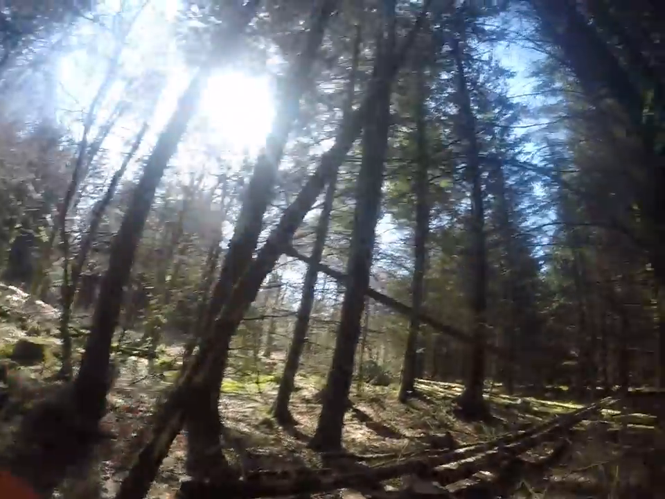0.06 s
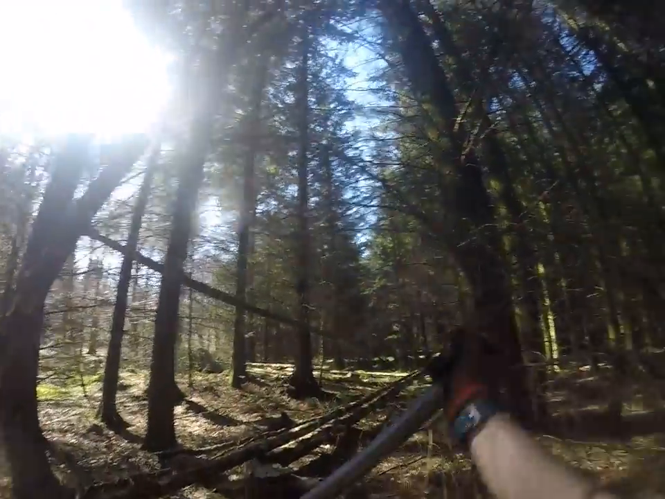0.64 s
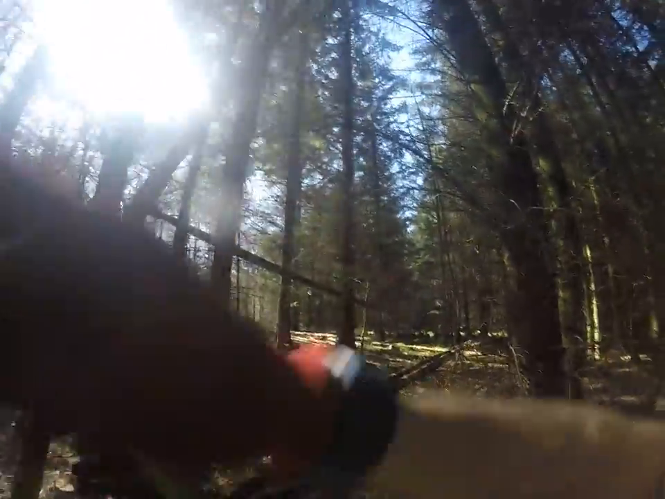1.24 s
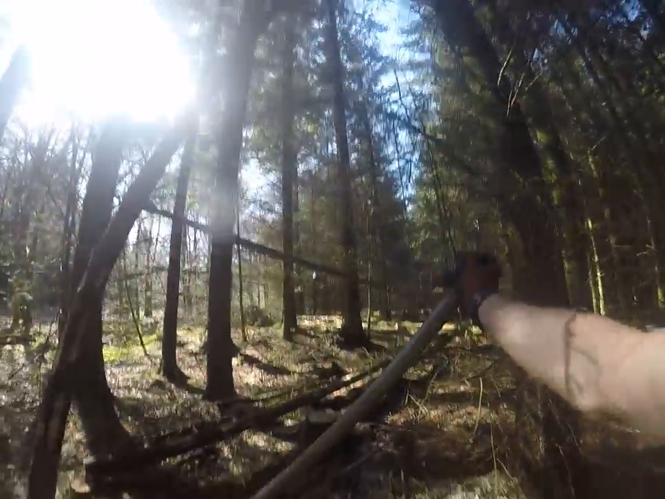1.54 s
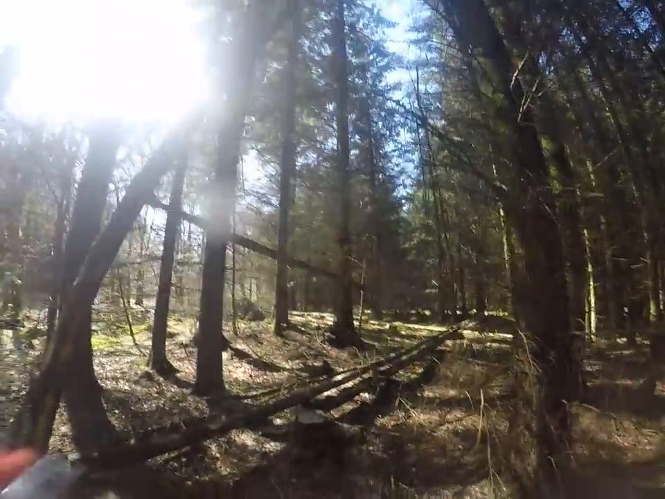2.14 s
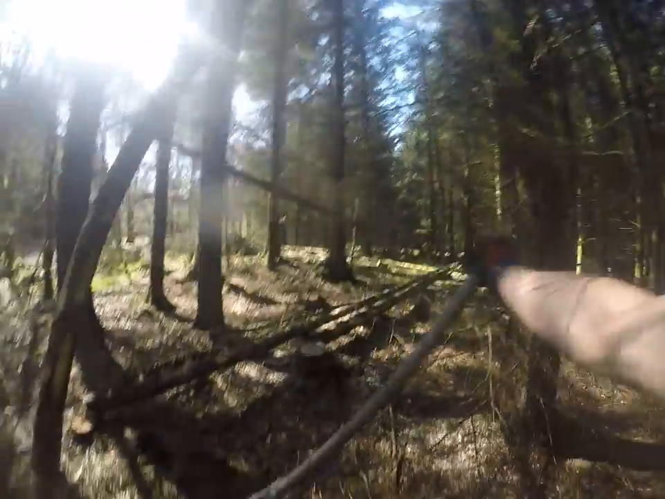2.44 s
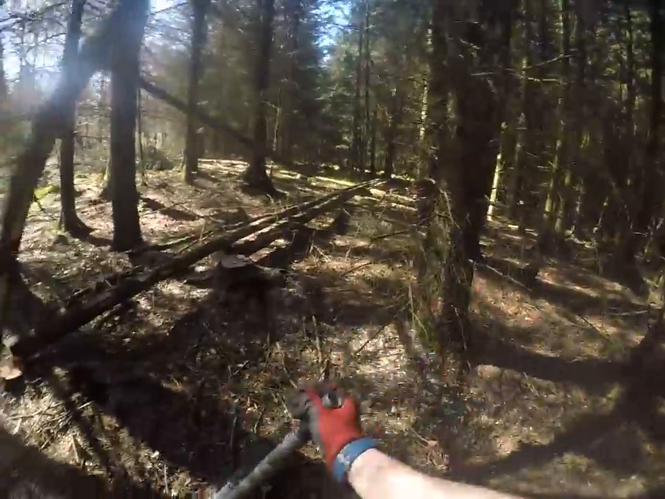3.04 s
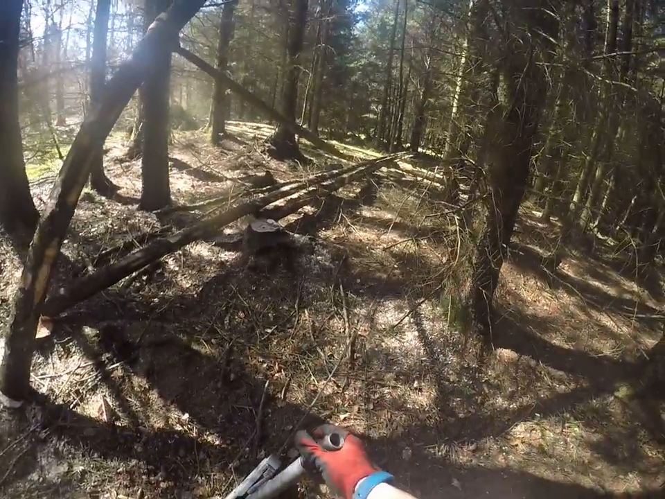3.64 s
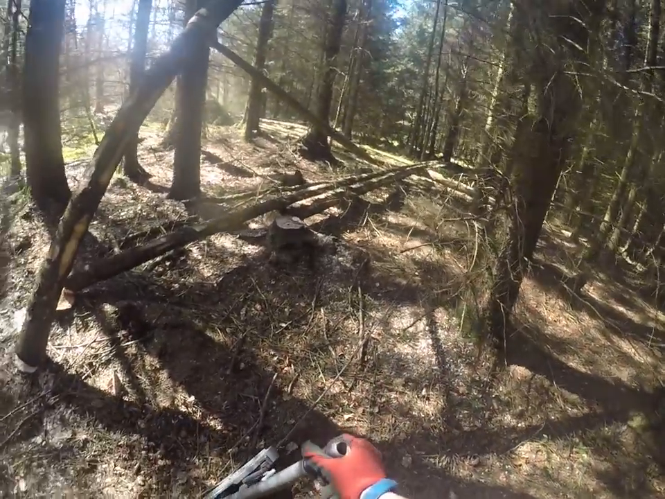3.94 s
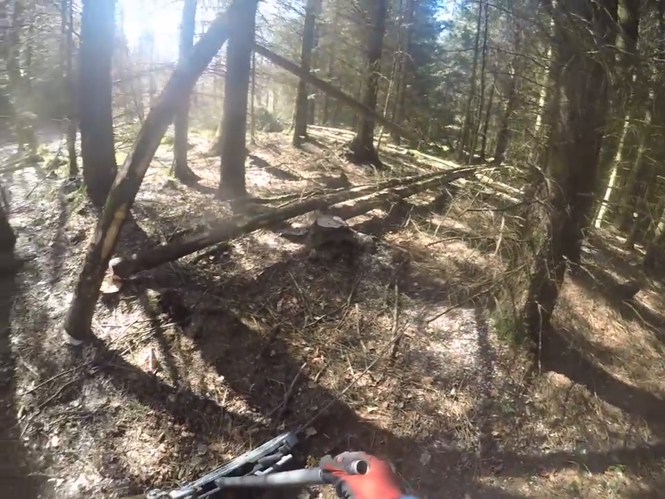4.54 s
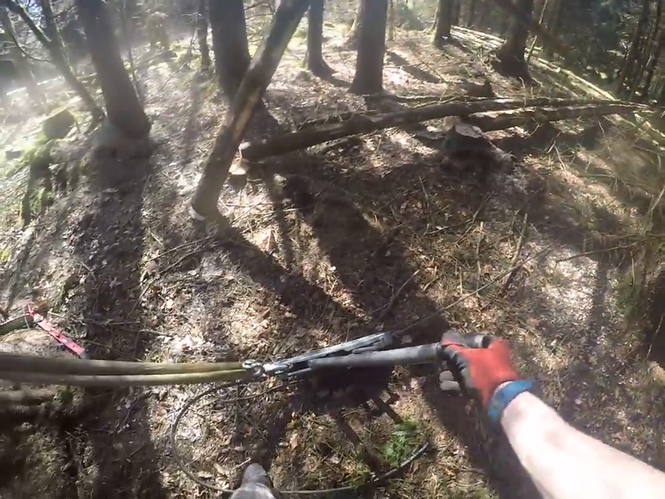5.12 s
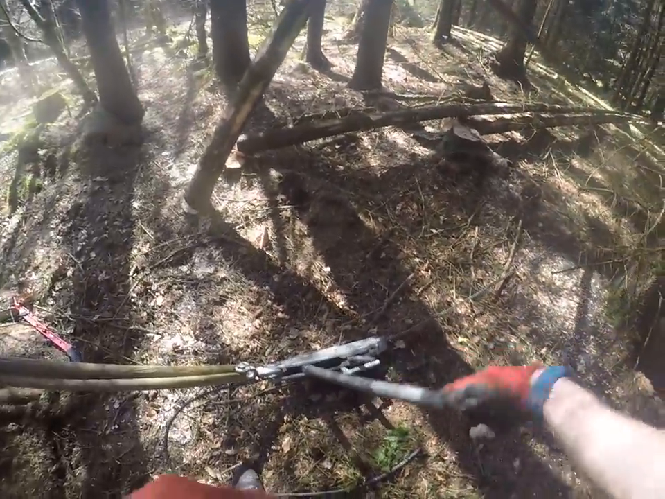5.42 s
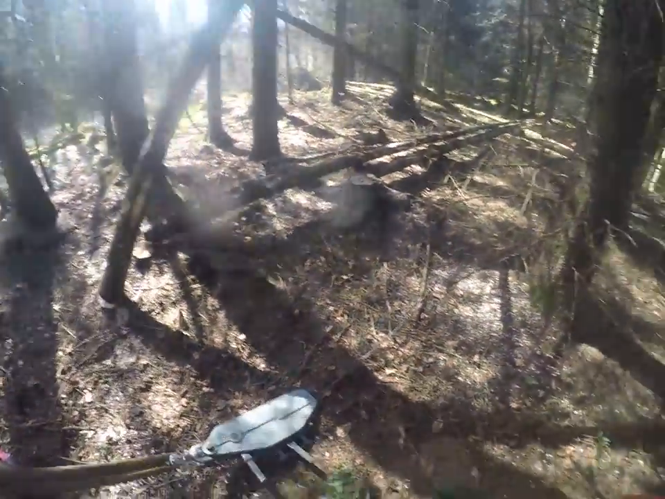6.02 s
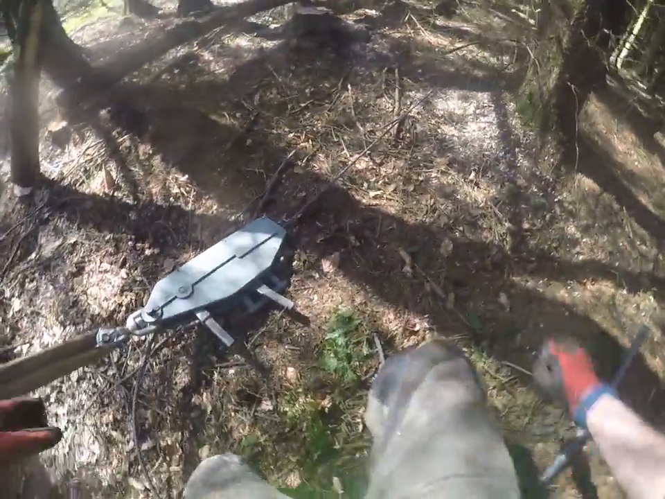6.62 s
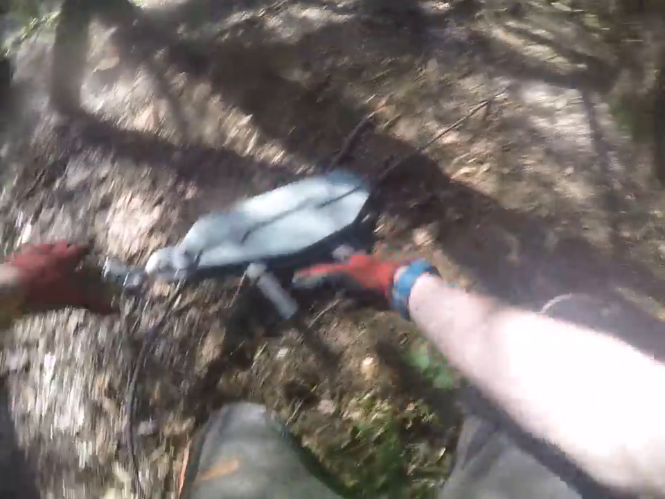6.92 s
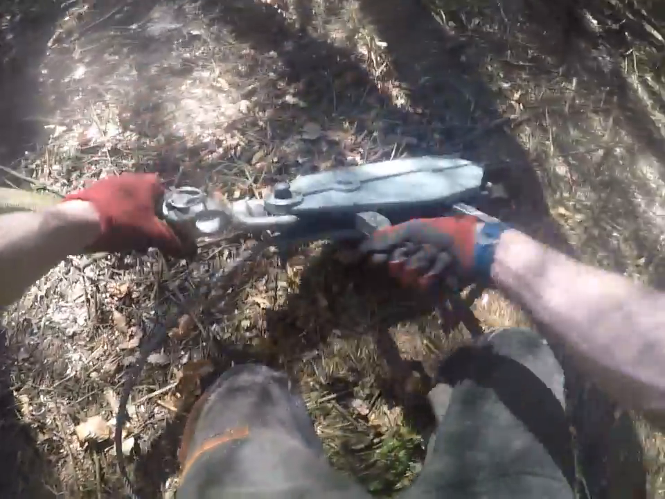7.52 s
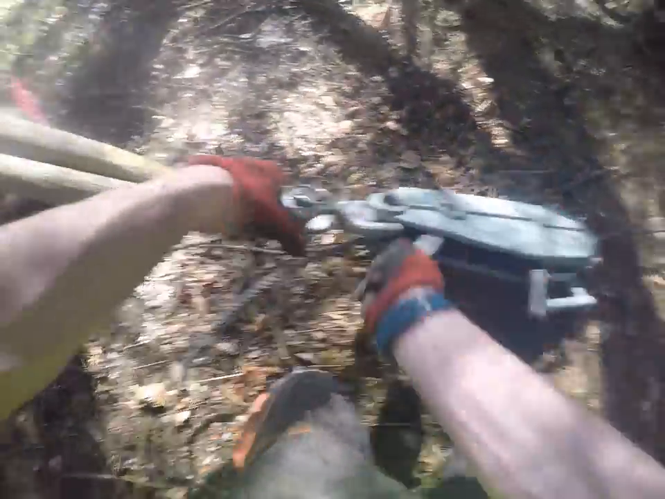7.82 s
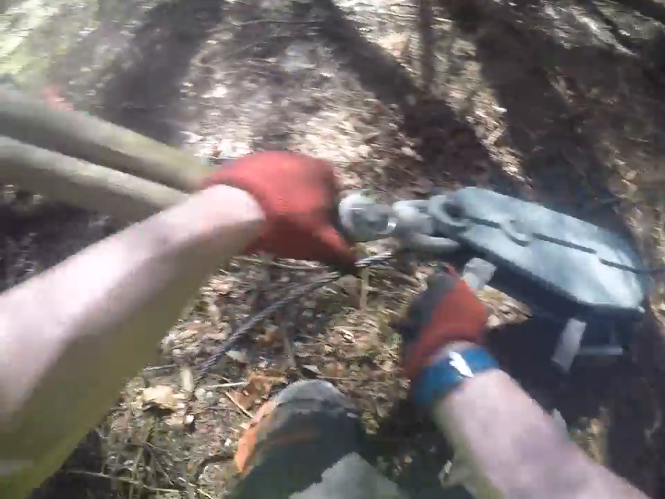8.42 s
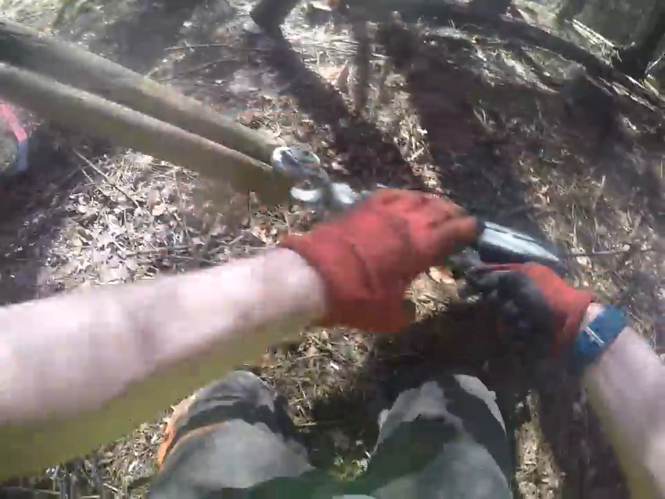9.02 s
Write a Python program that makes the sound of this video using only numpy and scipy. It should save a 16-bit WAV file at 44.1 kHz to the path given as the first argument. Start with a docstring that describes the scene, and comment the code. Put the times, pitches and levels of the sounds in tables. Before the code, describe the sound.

A hand cable winch is levered with close clothing rubs, knocks and rumble, then its steel parts clack loudly as it is picked up.

```python
"""In a forest, a hand cable winch is worked, heard from a camera worn on the body.
As the lever is pumped, clothing rubs the camera in short strokes of stick-slip friction, and its
case knocks and rumbles with every move. Feet crunch on dry litter. Then the winch is picked up: its
steel jaws and levers clack and ring close by, hard enough to overload the microphone."""
import sys
import numpy as np
from scipy import signal
from scipy.fft import rfft, irfft, next_fast_len
from scipy.io import wavfile
from scipy.ndimage import uniform_filter1d, map_coordinates

SR = 44100
rng = np.random.default_rng(int(sys.argv[2]) if len(sys.argv) > 2 else 0)


def int16_out(signal):
    """Quantize to a 16-bit WAV file."""
    q = np.round(np.clip(np.atleast_2d(signal).T, -1, 1) * 32767)
    wavfile.write(sys.argv[1], SR, q.astype(np.int16))


N = 408366

# Steel-on-steel hits; hollowness lifts 700-950 Hz, brightness lifts the top from 5 kHz:
# (time [s], level [dB], hollowness [dB], brightness [dB], thump [dB])
CLACK_HITS = [(6.9762, 2.5, -2.5, -7.5, -23.5), (6.9786, -11.5, 17, 8, -22), (6.9826, -4, 2, -9.5, -7),
              (7.0811, -20.5, 8.5, -19, -25), (7.369, -0.5, 5.5, 2.5, -24.5),
              (7.3741, -14, -3.5, -6, -21.5), (7.395, -27.5, 2, -4, -37.5), (7.405, -28, 7, -11, -29.5),
              (7.4328, -6, 4.5, -3, -14.5), (7.5462, -10, -1, 8, -29), (7.7031, -17.5, 7.5, 0.5, -74),
              (7.7131, -17.5, -9.5, -6, -59), (7.9298, -6.5, 7.5, 8, -41.5), (7.9369, -9, -4.5, 5, -39.5),
              (7.9818, -19.5, 6, -4, -24.5), (8.2001, -8.5, -7, 6, -43.5), (8.2078, -3.5, -1.5, -4, -31.5),
              (8.2217, -17.5, -3.5, 1, -29.5), (8.237, -17, 7.5, -13.5, -53), (8.2435, -4, -6, 7, -11),
              (8.755, -5.5, -11, 3, -24), (8.7611, -3, 0, 1, -25), (8.7901, -18, 5, -5, -38.5),
              (8.8033, -18, 1.5, -8.5, -34)]
# The ring of the winch: (frequency [Hz], level [dB], t60 [s])
WINCH_MODES = [(734, -14.5, 0.051), (844, -11.5, 0.04), (1108, -8.5, 0.035), (1257, -2.5, 0.019),
               (1453, 2.5, 0.018), (1635, 1.5, 0.011), (1830, -21.5, 0.076), (2050, -3, .018),
               (2246, 1.5, 0.015), (2512, -1.5, 0.02), (2800, -9.5, .022), (2810, -21, 0.064),
               (3342, -5.5, 0.016), (3560, -16, 0.0092), (3900, -10.5, .016), (4640, -15.5, 0.024),
               (5640, -14.5, 0.016), (5820, -7.5, 0.0067), (6400, -19.5, 0.015), (6700, -17, 0.0096)]
# The bite of a steel contact: (frequency [Hz], level [dB])
STEEL_SPECTRUM = [(100, -48), (500, -5.5), (1200, 1), (2500, 6), (3000, -5.5), (3600, 9), (6300, -13),
                  (8500, -12), (10000, -38), (15000, -37.5)]
def winch_clacks():
    """Jaws and levers strike steel: a hard crack and a short metallic ring."""
    return impacts(CLACK_HITS, WINCH_MODES, STEEL_SPECTRUM, crack_db=-5.5, crack_t60=0.011,
                   tail_db=-34.5, tail_t60=0.06, body_db=-4.5, gain_db=-0.5)


# Metal sliding on metal: (time [s], level [dB], length [s], brightness [dB])
SLIP_CUES = [(5.396, -39, .006, -1), (5.425, -36.5, 0.01, 0), (5.456, -24.5, 0.0069, -8),
             (5.95, -30, 0.019, -8), (5.989, -23.5, 0.018, -19), (6.037, -40, 0.0077, 15),
             (6.676, -28, 0.011, 18), (6.872, -27, .006, -23), (8.099, -44.5, 0.029, 2.5),
             (8.154, -42, 0.033, 6), (8.356, -46, .014, -8), (8.499, -44, 0.0066, -11),
             (8.598, -45.5, 0.015, 5.5), (8.643, -45, 0.015, 6), (8.685, -45.5, 0.023, 6.5),
             (8.724, -39.5, 0.011, -3)]
# The ring of the fittings: (frequency [Hz], level [dB], t60 [s])
FITTING_MODES = [(1808, 3.5, 0.035), (1970, -4, 0.026), (2540, -4, 0.062), (3400, 0, 0.007),
                 (4060, -13.5, 0.012), (4430, -4.5, 0.038), (5480, -10, 0.0092), (8000, -4.5, 0.0024)]
def cable_slips():
    """Cable and fittings slide in short gritty rasps; each spot rings at a slightly different pitch."""
    track, t = np.zeros(N), np.arange(SR // 10) / SR
    for start, db, length, bright_db in SLIP_CUES:
        detune = np.exp(0.025 * rng.standard_normal())
        spot = ring(FITTING_MODES, t * detune, scatter_db=2)
        ringing = unit(signal.fftconvolve(rng.standard_normal(len(t)), spot)[:len(t)])
        grit = unit(colour(rng.standard_normal(len(t)) ** 3, STEEL_SPECTRUM))
        rasp = colour(ringing + amp(-10.5) * grit, [(2500, 0), (7000, bright_db)])
        rise = 3 * t / length  # the swell peaks a third of the way in
        add(track, start, amp(db) * unit(rasp) * rise * np.exp(1 - rise))
    return track


# Knocks through the case: (time [s], level [dB], hollowness [dB], brightness [dB], thump [dB])
KNOCK_HITS = [(0.1537, -8.5, -16, 2.5, -28), (0.182, -26.5, 1, -4, -32), (0.2944, -18, 4.5, -4, -22),
              (0.449, -12, -10, -13.5, -33.5), (0.8418, -9.5, -8, -2.5, -36), (0.8963, -23, 6, 3, -18),
              (1.0109, -15.5, 18, -15, -21.5), (1.0646, -27, 0, -5.5, -17), (1.0728, -6, -3, 5.5, -30),
              (1.0748, -10, 8, -5, -14), (1.1245, -14.5, 11.5, -10, -15.5), (1.1823, -23, 17.5, 1, -35),
              (1.3742, -15, 5, 0.5, -18), (1.4495, -31, 12, 5, -20), (1.5197, -24, 4, -21, -38),
              (1.5962, -24, -25, -43, -32), (1.6697, -25, 1, -16, -33), (1.702, -27, 3, -15, -33),
              (1.7618, -19.5, 3, -8, -17), (1.805, -25.5, -4, 2, -37), (1.9766, -27, 5.5, -1, -30),
              (2.1158, -23.5, -2.5, -1, -20.5), (2.3198, -29, -4, -5, -30),
              (2.855, -24.5, -11.5, -15, -18.5), (2.8674, -24.5, -19, 1, -36),
              (2.9206, -22.5, -17, -7, -23), (2.979, -24, -18, -6, -49), (2.9844, -19, -6, -12, -15),
              (2.996, -4.5, -2.5, 2, -9), (3.164, -28.5, -9, 0, -24.5), (3.2267, -29.5, -17, -1, -21),
              (3.425, -29, -10, 0, -25.5), (3.541, -30.5, -2.5, -4, -31), (4.529, -38.5, 11.5, 2, -32),
              (4.8398, -11.5, 15, -14, -13), (4.908, -13, 13.5, -5, -8.5), (5.6964, -24.5, 16, 13, -32.5),
              (6.0217, -25.5, -6, -1, -14.5), (6.112, -15, -11.5, -14, -40), (6.7879, -21, -5, -15.5, -7)]
# The ring of the camera case: (frequency [Hz], level [dB], t60 [s])
CASE_MODES = [(781, -8.5, 0.032), (968, -12, 0.045), (1524, -5, 0.013), (1740, -6, 0.014), (2007, 2, 0.013),
              (2356, -4, 0.02), (3430, -13, 0.017), (4120, -12.5, 0.0087), (5370, -25, 0.0069),
              (6450, -28, 0.0038)]
# The attack of a knock: (frequency [Hz], level [dB])
KNOCK_SPECTRUM = [(100, 13.5), (500, -12.5), (1600, 8), (2400, 1.5), (3000, -12.5), (6000, -14),
                  (8000, -36), (14000, -44.5)]
def case_knocks():
    """The camera case knocks as the lever is worked and ticks faintly under the clothing."""
    hits = KNOCK_HITS + cloth_ticks(per_second=10, max_per_stroke=6)
    return impacts(hits, CASE_MODES, KNOCK_SPECTRUM, crack_db=0, crack_t60=0.014,
                   tail_db=-24.5, tail_t60=0.071, body_db=0, gain_db=-1)


# How hard the body shakes the camera: (time [s], sway [dB], rumble [dB])
BODY_MOTION = [(0.0, -28.5, -30), (0.36, -25.5, -43.5), (0.67, -34.5, -38.5), (1.13, -26.5, -32.5),
               (1.62, -34.5, -31), (1.8, -30, -37), (2.63, -36.5, -39), (4.56, -43, -54.5),
               (4.74, -43.5, -38.5), (5.13, -41, -51), (5.7, -43, -47.5), (5.9, -37, -47),
               (6.32, -35.5, -47.5), (6.99, -43, -45.5), (7.35, -44, -54), (7.61, -56, -66),
               (8.64, -54.5, -55.5), (9.26, -65.5, -75)]
# Sudden jolts on top: (time [s], length [s], level [dB])
JOLT_CUES = [(0.0, 0.28, -33), (0.87, 0.083, -29), (1.18, 0.18, -28), (2.48, .13, -27), (4.93, 0.025, -47),
             (5.39, 0.083, -38), (5.70, 0.13, -34.5), (6.94, 0.24, -39.5), (7.35, 0.077, -37.5),
             (8.22, 0.074, -36.5), (8.48, 0.038, -45.5), (8.75, 0.13, -43.5)]
# Sub-bass sway: (frequency [Hz], level [dB])
SWAY_SPECTRUM = [(10, -8), (22, -2), (35, -6.5), (55, -16), (90, -26.5), (200, -59.5), (400, -120)]
# Handling rumble: (frequency [Hz], level [dB])
RUMBLE_SPECTRUM = [(25, -16.5), (60, 2), (100, 3.5), (160, -7), (230, -7.5), (320, -26), (500, -31),
                   (900, -53.5), (2000, -85.5)]
def body_rumble():
    """The wearer's movements shake the camera: a slow sway and a lumpy rumble, swelling at each jolt."""
    sway_db, rumble_db = curves(BODY_MOTION)
    jolt = strokes(JOLT_CUES, attack=0.59, release=0.4)
    sway = unit(amp(wobble(10)) * noise(SWAY_SPECTRUM))
    rumble = unit(amp(4.2 * wobble(25)) * noise(RUMBLE_SPECTRUM))
    sway_gain = np.hypot(amp(sway_db + 5.5), amp(9.5) * jolt)
    rumble_gain = np.hypot(amp(rumble_db + 2.5), jolt)
    return sway_gain * sway + rumble_gain * rumble


# Strokes of clothing over the case: (time [s], length [s], level [dB])
RUB_CUES = [(0.0, 0.54, -41), (0.504, 0.26, -46.5), (0.72, 0.099, -40.5), (0.864, 0.18, -39),
            (1.039, .13, -34), (1.22, .23, -34.5), (1.498, 0.24, -41.5), (1.745, 0.15, -43.5),
            (1.856, 0.53, -44.5), (2.256, 0.19, -43.5), (2.464, 0.21, -42.5), (2.769, 0.15, -40),
            (2.994, 0.091, -42), (3.137, 0.24, -45), (3.35, .11, -41), (3.496, 0.13, -45.5),
            (4.133, 0.17, -47), (4.578, .32, -43.5), (4.903, 0.12, -48), (5.022, 0.32, -47),
            (5.41, 0.073, -47.5), (5.669, 0.83, -46.5), (6.126, 0.069, -43.5), (6.219, 0.13, -50),
            (6.38, .3, -47), (6.742, 0.28, -46.5), (7.252, .11, -61), (8.011, 0.19, -61.5),
            (9.115, 0.25, -64.5)]
# The midrange of the rub: (frequency [Hz], level [dB])
CLOTH_SPECTRUM = [(200, -22.5), (400, -15), (580, -18), (800, 3.5), (1150, -5.5), (1600, -1.5), (2250, 0),
                  (3000, -11.5), (3450, -9.5), (4800, -20.5), (6500, -20.5), (7600, -30), (15000, -47.5)]
# The fabric's fizzy top: (frequency [Hz], level [dB])
FIZZ_SPECTRUM = [(300, -12.5), (2000, 3), (5000, 11), (7500, 4), (9000, 2), (12000, -1), (14500, 1),
                 (16000, -20.5)]
# Level of the fine hiss, which drops away as the wearer bends down just after the first loud clack: (time [s],
# level [dB])
HISS_LEVEL = [(0, -67), (3.4, -57), (4.3, -64), (5.3, -62), (7.12, -63), (7.22, -87), (8.1, -68),
              (8.5, -80.5), (8.95, -72), (9.2, -87)]
def clothing_rub():
    """Fabric rests on the case and rubs in strokes, catching hard enough to ring it, with fizz on top."""
    hush_s, hush_length_s, hush_db = 7.1, 0.06, -8  # the resting rub drops after the first loud clack
    hushed = np.clip((np.arange(N) / SR - hush_s) / hush_length_s, 0, 1)
    motion_db = curves(BODY_MOTION)[1] + 47.5
    resting = amp(-56 + hush_db * hushed + 0.7 * motion_db)  # light contact follows the rumble
    stroking = strokes(RUB_CUES, attack=0.21, release=0.41)
    pressure = np.hypot(resting, stroking) * amp(0.95 * wobble(45))
    rub = friction(CLOTH_SPECTRUM, rate=460, spread_db=6, smooth_db=5, patchy_db=5)
    catches = judder(rate=99, spread_db=1.5, patchy_db=9)
    fizz = friction(FIZZ_SPECTRUM, rate=900, spread_db=6, smooth_db=4, patchy_db=1.5)
    fizz_gain = np.hypot(amp(curves(HISS_LEVEL)[0]), amp(-27) * pressure)
    return pressure * (rub + amp(-9.5) * catches) + fizz_gain * fizz


def cloth_ticks(per_second, max_per_stroke):
    """Faint knocks at random moments of each clothing stroke; rows as in KNOCK_HITS."""
    hits = []
    for start, length, stroke_db in RUB_CUES:
        chance, place = rng.random((2, max_per_stroke))
        accent_db, hollow_db, bright_db = 1.5 * rng.standard_normal((3, max_per_stroke))
        heard = chance < per_second * length / max_per_stroke
        times = np.minimum(start + place * length, (N - 1) / SR)
        db = stroke_db + accent_db
        ticks = np.column_stack([times, db + 5.5, hollow_db - 1, bright_db + 0.5, db - 2.5])
        hits += list(ticks[heard])
    return hits


# Harness on the case: (time [s], length [s], level [dB])
SCRAPE_CUES = [(0.051, 0.022, -32.5), (0.169, 0.042, -28.5), (1.035, 0.059, -21), (1.07, 0.039, -37),
               (1.474, 0.031, -28.5), (1.604, 0.044, -31), (1.659, 0.07, -33.5), (1.735, 0.023, -28.5),
               (2.291, 0.048, -37), (2.52, 0.18, -41), (3.371, 0.026, -43), (4.815, .035, -27),
               (5.02, 0.075, -46.5), (6.263, 0.053, -48)]
def harness_scrapes():
    """The harness drags over the case in short juddering swells."""
    pressure = np.zeros(N)
    for start, length, db in SCRAPE_CUES:
        add(pressure, start, amp(db) * np.sqrt(np.hanning(round(length * SR))))
    return pressure * judder(rate=360, spread_db=7.5, patchy_db=1)


# Crisp fabric accents: (time [s], length [s], level [dB])
CRINKLE_CUES = [(0.69, 0.13, -50), (1.24, 0.097, -52), (1.38, 0.062, -52), (1.79, 0.031, -40.5),
                (2.86, 0.029, -43), (3.27, .16, -55), (3.94, 0.052, -50), (5.28, 0.038, -55),
                (5.745, 0.054, -54)]
def fabric_crinkles():
    """Folds of stiff fabric give way in bursts of tiny bright snaps."""
    crackle = friction(FIZZ_SPECTRUM, rate=500, spread_db=8.5, smooth_db=-12, patchy_db=4.5)
    return strokes(CRINKLE_CUES, attack=0.2, release=0.58) * crackle


# Footsteps: (time [s], length [s], level [dB])
STEP_CUES = [(5.13, 0.075, -43), (5.21, 0.093, -36.5), (5.7, 0.054, -38.5), (5.785, 0.08, -42.5)]
# The crunch of dry litter: (frequency [Hz], level [dB])
LITTER_SPECTRUM = [(200, -20), (550, -18.5), (900, 3), (1200, -2.5), (2000, -13), (3000, -24), (4200, -11),
                   (6000, -23), (8500, -24), (9500, -36), (14500, -37)]
# The winch drags as it is lifted: (time [s], length [s], level [dB])
DRAG_CUES = [(7.02, 0.11, -26.5)]
# Its scuff over the ground: (frequency [Hz], level [dB])
DRAG_SPECTRUM = [(200, -28.5), (600, -14), (900, -2), (1300, 5.5), (2200, -10), (3000, -16), (4000, -19),
                 (6000, -25), (8600, -40.5), (9500, -49.5), (15000, -51.5)]
def forest_floor():
    """Needles and leaves crunch under the feet and under the dragged winch."""
    crunch = friction(LITTER_SPECTRUM, rate=1100, spread_db=4, smooth_db=-1, patchy_db=2.5)
    scuff = friction(DRAG_SPECTRUM, rate=900, spread_db=3, smooth_db=-2, patchy_db=2)
    steps = strokes(STEP_CUES, attack=0.2, release=0.19) * crunch
    drag = strokes(DRAG_CUES, attack=0.49, release=0.324) * scuff
    return steps + drag


# The ambience bed: (frequency [Hz], level [dB])
AIR_SPECTRUM = [(30, 17), (200, 5), (400, 3.5), (1000, -3.5), (1800, -3), (4000, -12), (14000, -22.5)]
def forest_air():
    """Still air lays a faint, dark hush under everything."""
    return amp(-70) * noise(AIR_SPECTRUM)


# The low thump of the camera mount: (frequency [Hz], level [dB], t60 [s])
MOUNT_MODES = [(103.7, 0, 0.071), (151, -1.5, 0.043), (223, -1.5, .04)]
def impacts(hits, modes, spectrum, crack_db, crack_t60, tail_db, tail_t60, body_db, gain_db):
    """Each contact: ringing modes, a crack with a faint noisy tail, and a thump through the mount."""
    track, t = np.zeros(N), np.arange(SR // 5) / SR
    fade = amp(-60 * t / crack_t60) + amp(tail_db - 60 * t / tail_t60)
    for start, db, hollow_db, bright_db, thump_db in hits:
        crack = punch(colour(rng.standard_normal(len(t)) * fade, spectrum))
        hit = punch(ring(modes, t, scatter_db=4)) + amp(crack_db) * crack
        # Small parts radiate little bass; where and how hard the contact falls tilts the rest.
        bass_db = min(hollow_db, 0.58 * hollow_db) + body_db
        eq = [(380, bass_db), (700, hollow_db), (950, hollow_db), (1450, 0), (2500, 0), (5000, bright_db)]
        thump = ring(MOUNT_MODES, t, scatter_db=3.5) * (1 - np.exp(-t / 0.0032))
        add(track, start, amp(db + gain_db) * punch(colour(hit, eq)) + amp(thump_db) * thump)
    return track


def ring(modes, t, scatter_db):
    """Damped modes, each struck with a new strength and sign."""
    hz, db, t60 = np.transpose(modes)[:, :, None]
    strength = amp(db + scatter_db * rng.standard_normal(hz.shape)) * rng.choice([-1, 1], hz.shape)
    return np.sum(strength * amp(-60 * t / t60) * np.sin(2 * np.pi * hz * t), axis=0)


def friction(spectrum, rate, spread_db, smooth_db, patchy_db):
    """Tiny stick-slip snaps over a smooth hiss; the colour shifts as the contact moves. Rms 1."""
    grain = unit(snaps(rate, spread_db)) + amp(smooth_db) * rng.standard_normal(N)
    return unit(colour(patchy(grain, patchy_db, bins=5, frames=10), spectrum))


def judder(rate, spread_db, patchy_db):
    """Catches and releases that ring the case, each in its own colour. Rms 1."""
    catches = snaps(rate, spread_db)
    case_ring = ring(CASE_MODES, np.arange(SR // 20) / SR, scatter_db=0)
    ringing = signal.fftconvolve(catches, case_ring)[:N]
    return unit(patchy(ringing, patchy_db, bins=3, frames=6))


def snaps(rate, spread_db):
    """Impulses of uneven size at random moments, about rate a second."""
    impulses = (rng.random(N) < rate / SR) * rng.choice([-1, 1], N)
    return impulses * amp(spread_db * np.clip(rng.standard_normal(N), -2, 2))


def patchy(x, depth_db, bins, frames):
    """Make the tone flicker with random gains in patches of frequency and time."""
    spectra = signal.stft(x, nperseg=256)[2]
    patches = uniform_filter1d(rng.standard_normal(spectra.shape), bins, axis=0)
    patches = uniform_filter1d(patches, frames, axis=1)
    return signal.istft(spectra * amp(depth_db * unit(patches)), nperseg=256)[1][:N]


def strokes(cues, attack, release):
    """Envelope that swells, holds and eases off at each cue; attack and release are shares of its length."""
    gain = np.zeros(N)
    for start, length, db in cues:
        progress = np.linspace(0, 1, round(length * SR))
        shape = np.clip(np.minimum(progress / attack, (1 - progress) / release), 0, 1)
        add(gain, start, amp(db) * np.sin(np.pi / 2 * shape))
    return gain


def colour(x, points):
    """Minimum-phase EQ through (frequency [Hz], gain [dB]) points on a log axis."""
    size = 2 * next_fast_len(len(x) // 2 + 4096)
    hz, db = np.transpose(points)
    gain = amp(np.interp(np.log(np.fft.rfftfreq(size, 1 / SR) + 1), np.log(hz + 1), db))
    cepstrum = irfft(np.log(gain), size)
    cepstrum[1:size // 2] *= 2  # folded forward, so nothing rings ahead of a hit
    cepstrum[size // 2 + 1:] = 0
    return irfft(rfft(x, size) * np.exp(rfft(cepstrum)), size)[:len(x)]


def noise(spectrum):
    """Coloured noise of rms 1."""
    return unit(colour(rng.standard_normal(N), spectrum))


def wobble(rate):
    """A smooth random curve, rate knots a second."""
    knots = rng.standard_normal(int(N * rate / SR) + 4)
    return map_coordinates(knots, [np.arange(N) * rate / SR])


def curves(rows):
    """An automation curve for each column after the time."""
    times, *columns = np.transpose(rows)
    return [np.interp(np.arange(N) / SR, times, column) for column in columns]


def add(track, start, sound):
    """Mix a sound into the track at start seconds."""
    part = track[round(start * SR):][:len(sound)]
    part += sound[:len(part)]


def amp(db):
    """Decibels to gain."""
    return 10 ** (np.asarray(db) / 20)


def unit(x):
    """Scale to rms 1."""
    return x / np.sqrt(np.mean(x ** 2) + 1e-20)


def punch(x):
    """Scale a hit to rms 1 over its first 5 ms."""
    return x / np.sqrt(np.mean(x[:SR // 200] ** 2) + 1e-20)


def scene():
    """A dry mono mix: the action is close to the microphone and the forest is open."""
    wearer = harness_scrapes() + body_rumble() + clothing_rub() + fabric_crinkles()
    forest = forest_floor() + forest_air()
    winch = cable_slips() + winch_clacks()
    return (winch + case_knocks() + wearer + forest)[None]


# Peaks and dips of the camera housing: (frequency [Hz], gain [dB])
HOUSING_EQ = [(1400, -0.5), (1650, 3), (2100, 0), (2280, 1), (2430, -2), (2700, 2.5), (2980, -1.5),
              (3380, -1), (3700, -3.5), (4030, 0.5), (4350, -2.5), (6500, -1.5), (7200, -3.5), (8200, -2.5)]
def record(dry):
    """The housing colours the mix, the hardest clacks flatten at full scale, and a steep cut ends the top."""
    inside = colour(dry[0], HOUSING_EQ)
    clipped = inside / (1 + np.abs(inside) ** 6) ** (1 / 6)
    size, cutoff_hz = next_fast_len(N + SR // 2), 15350
    low_pass = 1 / (1 + (np.fft.rfftfreq(size, 1 / SR) / cutoff_hz) ** 60)
    return irfft(rfft(clipped, size) * low_pass, size)[None, :N]


dry = scene()
out = record(dry)
int16_out(out)
```